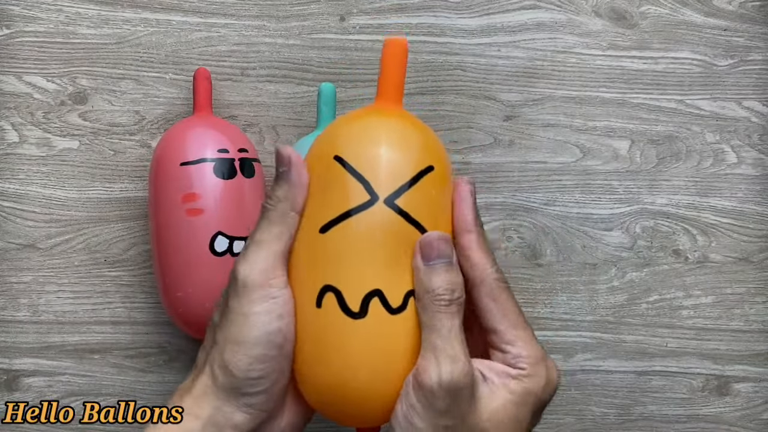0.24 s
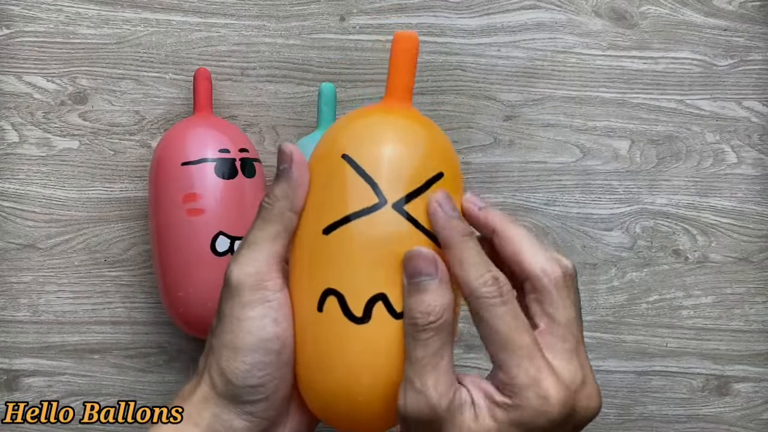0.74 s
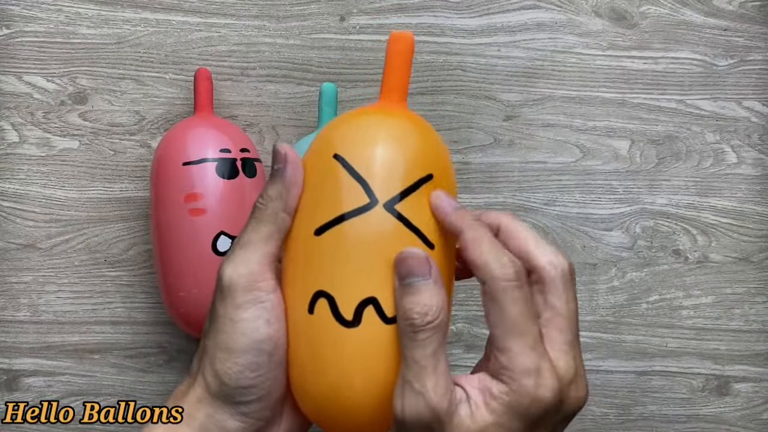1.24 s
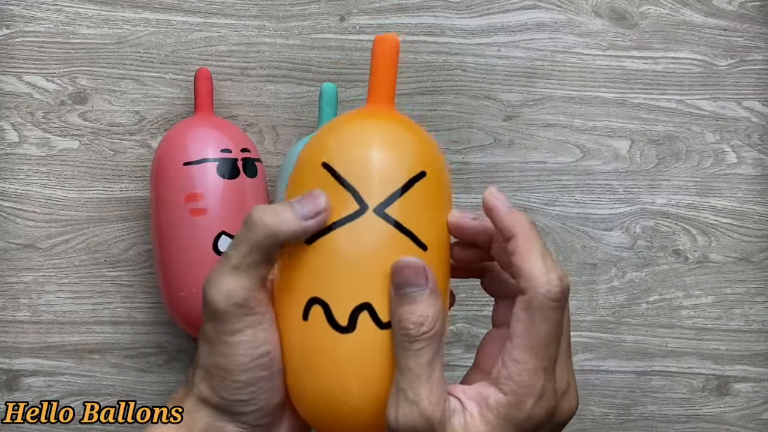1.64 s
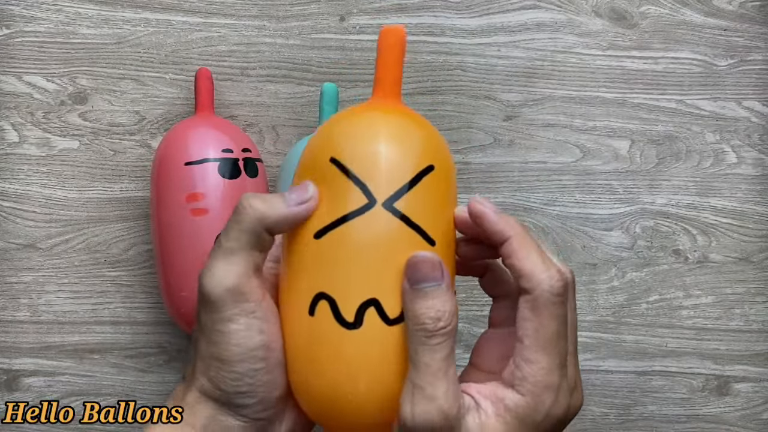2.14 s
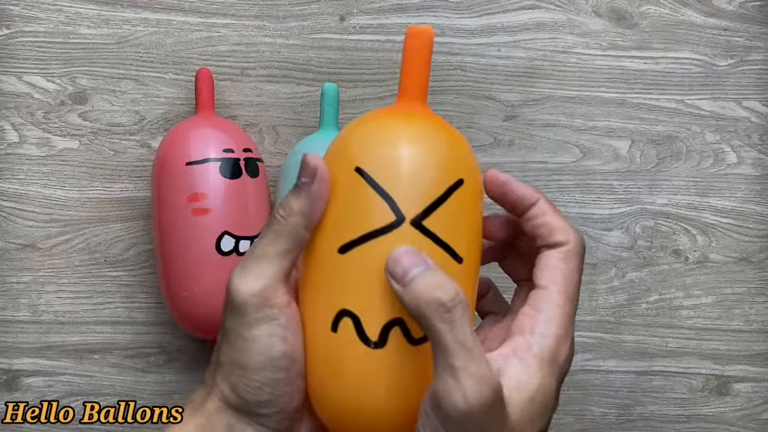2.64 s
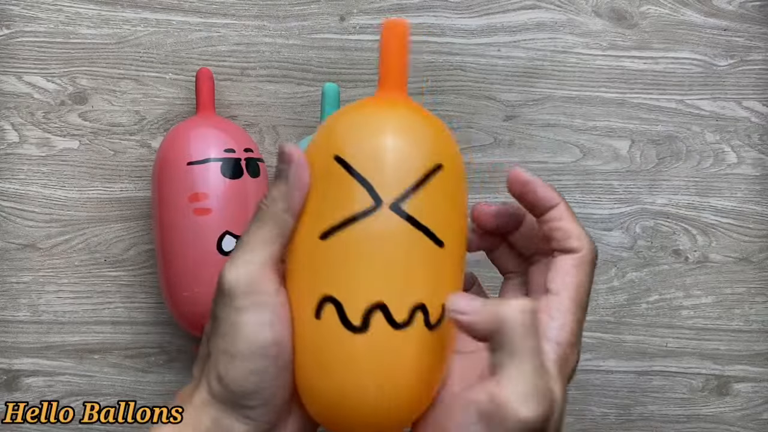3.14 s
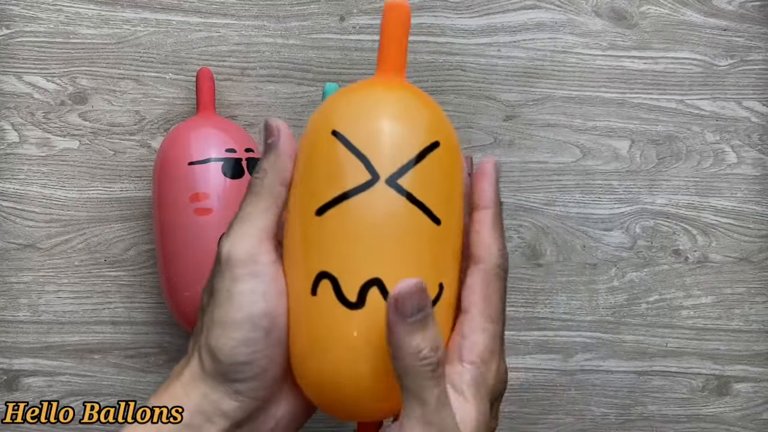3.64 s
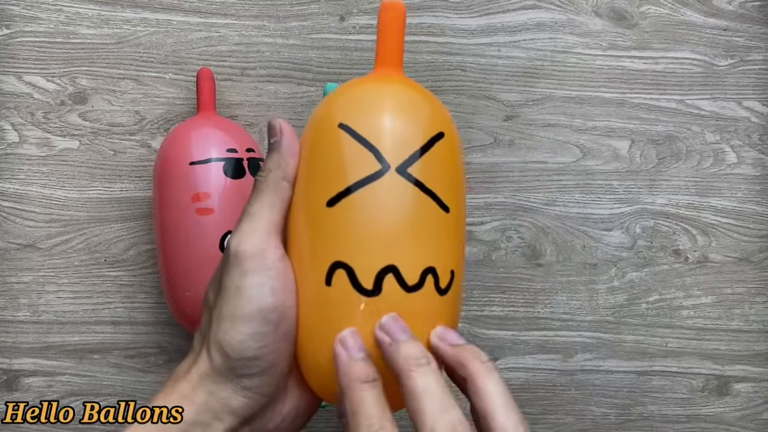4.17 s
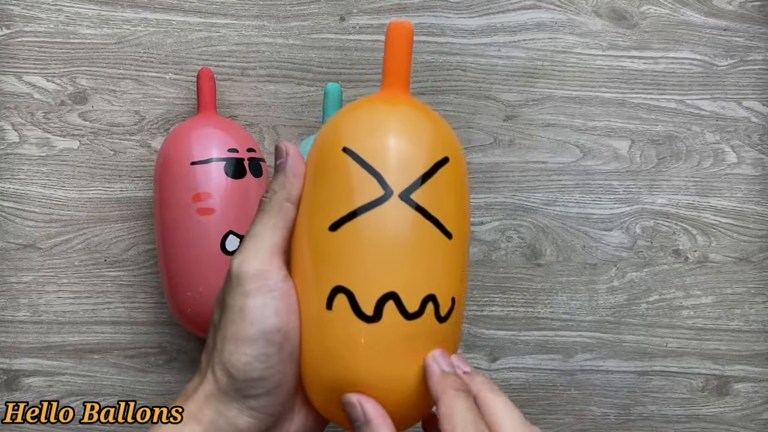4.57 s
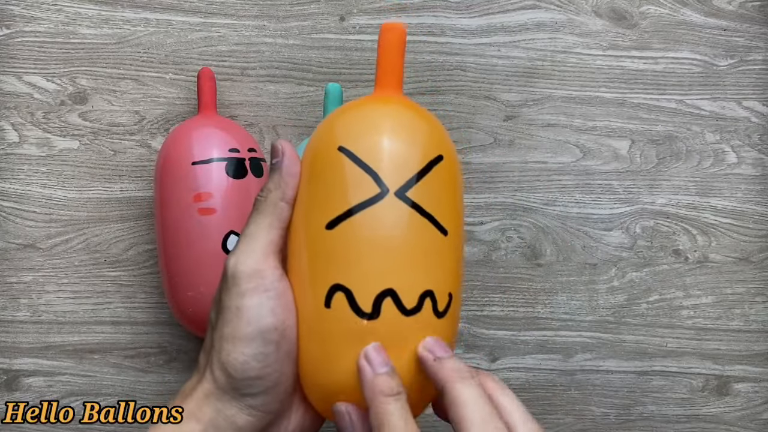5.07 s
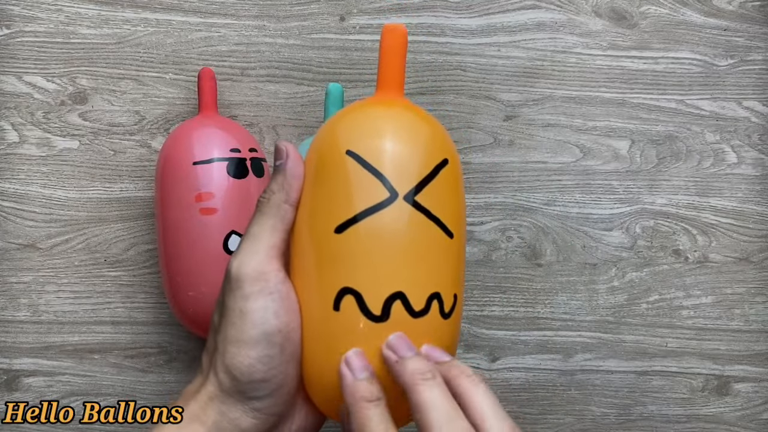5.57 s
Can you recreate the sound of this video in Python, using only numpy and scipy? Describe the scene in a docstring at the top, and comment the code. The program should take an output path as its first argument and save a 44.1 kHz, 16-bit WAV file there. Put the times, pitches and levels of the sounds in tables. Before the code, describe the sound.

Hands rub and squeeze a filled rubber balloon close up, making short, irregular creaks, snaps and squeaks in a small room.

```python
"""A small room: hands rub and squeeze a filled rubber balloon over a table, close to a stereo mic.
The fingers stick and slip. Each slip sends a falling ripple round the skin; trains of slips creak,
single hard ones snap, and the fastest lock into short squeals. The air inside rings and the soft
body wobbles. Behind it sit the faint creep of a palm, soft reflections and a low room rumble."""
import sys
import numpy as np
from scipy import signal
from scipy.fft import rfft, irfft
from scipy.io import wavfile
from scipy.ndimage import uniform_filter1d

SR = 44100
rng = np.random.default_rng(int(sys.argv[2]) if len(sys.argv) > 2 else 0)


def int16_out(signal):
    """Quantize to a 16-bit WAV file."""
    q = np.round(np.clip(np.atleast_2d(signal).T, -1, 1) * 32767)
    wavfile.write(sys.argv[1], SR, q.astype(np.int16))


N = 256220

# Finger drags, layer levels before the trims in creak(): start/s, end/s, grip/s, release/s,
# ripple/dB, heave/dB, chatter/dB, crackle/dB, skin resonance at full grip/Hz, mid-drag slip rate/Hz
DRAG_CUES = [ (0, 0.065, 0.0032, 0.0087, -31.5, -35.5, -47, -50.5, 647, 109),
             (.228, 0.316, .032, 0.0046, -27.5, -32, -46.5, -50, 700, 170),
             (0.344, 0.378, .003, 0.027, -44, -46, -49, -58.5, 684, 230.9),
             (0.382, 0.457, 0.016, 0.0067, -53, -63.5, -61, -61, 650, 330),
             (.728, 0.829, 0.022, 0.032, -26.5, -33.5, -42.5, -51, 678, 180),
             (1.02, 1.105, 0.045, 0.028, -31, -32.5, -50.5, -51, 655, 207),
             (1.261, 1.302, 0.0069, 0.025, -34.5, -36, -73, -56, 708, 210),
             (1.407, 1.446, 0.0041, 0.015, -48, -57, -65, -56.5, 665, 157),
             (1.446, 1.497, 0.025, 0.023, -30, -36.5, -50, -47, 685, 301.07),
             (1.605, 1.688, 0.055, 0.013, -28, -34, -34, -39.5, 734, 214),
             (1.835, 1.928, .02, 0.053, -41, -47.5, -65, -56, 692, 146),
             (2.125, 2.227, 0.093, 0.002056, -45, -50, -64, -58.5, 668, 197),
             (2.449, 2.612, 0.02, 0.087, -42.5, -54, -52, -57, 660, 145),
             (2.701, 2.804, 0.045, 0.022, -38, -48.5, -47, -50, 677, 200),
             (2.91, 3.007, 0.08, 0.027, -35, -45, -40.5, -47.5, 690, 201),
             (3.081, 3.123, 0.03, 0.0016, -33.5, -47, -44, -47, 750, 286),
             (3.134, 3.198, 0.0015, 0.044, -41, -43.5, -57, -57, 630, 347.1),
             (3.439, 3.485, 0.0038, .034, -40.5, -53, -52.5, -57, 665, 290),
             (3.478, 3.514, 0.0022, 0.017, -34, -40, -36.5, -49, 643, 280),
             (3.584, 3.635, 0.0018, 0.043, -48, -47.5, -46, -50, 610.8, 218),
             (3.746, 3.868, 0.014, 0.047, -31, -36, -56, -50, 620, 160),
             (4.137, 4.179, 0.013, 0.0058, -52.5, -63, -62.5, -57.5, 720, 200),
             (4.171, 4.229, 0.0052, .026, -25.5, -39.5, -33.5, -47, 683.3, 190),
             (4.273, 4.377, 0.011, 0.041, -26, -37.5, -42, -42, 723, 179),
             (4.373, 4.518, 0.015, 0.067, -22.5, -32, -35, -38.5, 647, 203),
             (4.519, 4.657, 0.014, 0.086, -22.5, -29.5, -33, -43.5, 728, 180),
             (4.69, 4.771, 0.0046, 0.021, -53.5, -56.5, -73, -60.5, 700, 220),
             (4.876, 4.902, .004, 0.003, -39.5, -59.5, -53, -59, 713.7, 305),
             (4.903, 4.984, 0.012, .002, -33.5, -52, -47, -47, 706, 350),
             (4.986, 5.124, 0.0023, 0.025, -28, -38, -46.5, -49, 704, 170),
             (5.159, 5.252, 0.011, 0.0096, -26.5, -34, -40.5, -49, 654, 191.67),
             (5.251, 5.381, .016, 0.053, -25.5, -32, -36.5, -54, 767, 180),
             (5.603, 5.683, 0.0084, 0.0021, -27.5, -41.5, -39.5, -58, 746, 229),
             (5.679, 5.811, 0.0038, 0.014, -22.5, -34.5, -44, -45.5, 700, 168), ]
# Single hard slips, levels before the trims in snap(): t/s, ripple/dB, skin pitch/Hz, heave/dB, tick/dB
SNAP_CUES = [(0.039, -21, 636, -41.5, -53), (0.071, -18, 790, -28.5, -38), (0.079, -18.5, 700, -23, -46),
             (0.198, -33, 655, -48, -61), (0.209, -33, 641.2, -47.5, -56), (0.32, -14.5, 738, -28.5, -34.5),
             (0.441, -42.5, 634, -63, -62), (0.712, -34, 685.7, -39.5, -67),
             (0.722, -28.5, 700, -35.5, -56), (0.757, -17.5, 657, -21, -60),
             (0.795, -20.5, 718.4, -36.5, -44), (0.963, -45, 624, -50, -63), (1.018, -37, 595, -49, -57),
             (1.038, -22, 630, -25.5, -52), (1.068, -19, 692, -25, -55), (1.209, -34.5, 680, -44, -54),
             (1.267, -32, 715, -31.5, -58), (1.407, -33.5, 693, -50, -59), (1.423, -36, 600, -52, -55),
             (1.46, -26, 660, -32, -71), (1.47, -22.5, 726, -36, -67), (1.652, -19.5, 734, -29.5, -51),
             (1.659, -21, 770, -25.5, -50), (1.885, -34, 714, -85, -48.5), (1.941, -28, 740, -30.5, -45),
             (2.016, -33.5, 710, -44, -51.5), (2.044, -22, 612, -31, -51), (2.049, -20.5, 670, -23, -42),
             (2.215, -16.5, 700, -21, -34), (2.394, -45, 670, -60, -71), (2.509, -32.5, 678, -54, -46.5),
             (2.584, -33.5, 632.4, -39.5, -55), (2.765, -19, 705, -32, -41), (2.87, -46.5, 710, -57, -69),
             (2.97, -20.5, 650, -34, -40), (3.121, -13, 685, -21.5, -33.5), (3.196, -33.5, 690, -42, -52),
             (3.215, -16, 703, -24, -44), (3.234, -11.5, 787, -29.5, -32.5),
             (3.319, -23.5, 676, -36, -48.5), (3.33, -26.5, 576, -47, -64.5), (3.418, -41, 617, -56, -80.5),
             (3.483, -24, 624, -34.5, -38.5), (3.512, -12, 737, -17.5, -51.5),
             (3.578, -19.5, 607, -52, -42), (3.667, -35, 573, -44, -57), (3.697, -36.5, 675, -49, -56),
             (4.097, -40.5, 750, -45, -72.5), (4.296, -14, 735, -41, -59), (4.909, -21.5, 705, -46, -49.5),
             (4.991, -18.5, 844, -57, -45), (4.999, -17, 800, -52, -39), (5.008, -15.5, 698, -45, -46),
             (5.164, -20.5, 630, -32, -62), (5.532, -43, 690, -46, -75), (5.74, -13, 697, -52, -36.5)]
# Slips locked into a tone: t/s, length/s, first f/Hz, last f/Hz, level/dB, overtones/dB, roughness/0-1
SQUEAL_CUES = [ (0.079, .012, 1390, 2018, -23.5, -3.5, 0.49), (0.08, 0.011, 2650, 3710, -32, -19, 0.39),
               (0.32, 0.01, 2210, 3370, -25, -13.5, 0.86), (0.392, 0.024, 2306, 3470, -50.5, -16, 0.32),
               (0.502, 0.034, 1720, 2460, -65, -22, 0.75), (0.797, 0.017, 748, 968, -26, -13.5, 0),
               (0.809, 0.019, 1142, 1526, -40, -6.5, 0.04), (1.069, 0.014, 684, 655, -24.5, -16.5, 0.03),
               (1.669, 0.011, 1703, 3280, -34.5, 4, 0.61), (1.944, 0.014, 1474, 3020, -40.5, -5.5, 0.91),
               (2.039, 0.028, 1248, 2300, -38, -4, 0.85), (2.211, 0.022, 1727, 3290, -42.5, 5, 0.9),
               (2.77, 0.024, 697, 744, -28.5, -29, 0.16), (3.237, 0.0075, 858, 1168, -17, -13.5, 0.16),
               (3.238, 0.011, 1983, 3950, -26.5, -11.5, 0.56), (3.51, .011, 2014, 4030, -21.5, -14, 0.84),
               (3.759, 0.01, 684, 641, -23.5, -25, 0.08), (3.77, 0.035, 648, 570.5, -14, -28.5, 0.04),
               (3.805, .034, 600, 487.4, -25.5, -19, .4), (4.407, 0.03, 699, 678, -17, -19, 0.11),
               (4.701, 0.026, 1493, 1820, -54.5, 1, 0.31), (4.91, .03, 1055, 1250, -38.5, -10.5, 0.11),
               (4.938, 0.024, 1170, 1313, -36, -5, .1), (4.958, .028, 1325, 1003, -36, -16, 0.19),
               (4.985, .03, 951, 736, -27, -13.5, .15), (5.024, .028, 734, 657, -23, -20, .25),
               (5.398, 0.027, 1797, 2144, -51.5, -10.5, 0.48), (5.653, 0.014, 659, 740, -23.5, -24, 0),
               (5.684, .052, 674, 664, -27.5, -25, 0.36), (5.736, .042, 829, 729, -23.5, -22, 0.35)]
# Standing waves in the enclosed air: f/Hz, relative level/dB, t60/s
AIR_MODES = [(407, -6, .2), (599, -6, .1), (1277, -7, .1), (1597, 2, .13), (1790, -9, .08), (2023, -5, .12),
             (2200, -7, .09), (2541, -7, .1), (2816, 1.5, .13), (3094, 4, .15), (3230, -3, .12),
             (3696, -1, .13), (3980, -7, .12), (4343, -6, .13), (5800, -7, .12)]
# Tone of the grit as rubber tears loose: f/Hz, level/dB
CRACKLE_EQ = [(300, -31), (900, -20), (1600, -5.5), (2900, 3), (4000, -7), (5500, -10), (8000, -10.5),
              (10000, -13), (15000, -19.5)]
# Dry skin on rubber, a further EQ that thins crackle to fizz: f/Hz, level/dB
FIZZ_EQ = [(1500, -41), (4000, -4), (7000, -16.5), (10000, -11), (15000, 3)]
# How well the hollow balloon radiates: f/Hz, level/dB
BODY_EQ = [(100, 2), (300, -1), (400, 0.5), (500, -2.5), (590, 4.5), (720, 1.5), (900, 0), (1180, -2.5),
           (1290, 2), (1430, -8.5), (1600, 3), (1800, 2), (1920, 0), (2050, 0), (2700, 0.5), (3300, 2),
           (3700, 2), (4100, -3), (5000, 0), (6000, 0.5), (11000, -1)]
# Left capsule over right: f/Hz, level/dB
LEFT_BALANCE = [(60, -2.4), (250, 1.6), (600, -0.5), (1100, 5.5), (2200, 2.5), (4000, 5.5), (12000, -1.5)]
# The left capsule hears the balloon first: f/Hz, phase lead/rad
LEFT_LEAD = [(0, 0), (60, .15), (250, .35), (700, .52), (1300, .9), (1650, .7), (2200, 1.5), (3100, 2.3),
             (4400, 5.5), (6400, 6.7), (8400, 9), (10000, 12.3), (12000, 15.5), (15000, 19.5)]
# Decay of the room: f/Hz, t60/s
ROOM_DECAY = [(100, 0.27), (500, 0.25), (1500, 0.34), (4000, 0.26), (8000, 0.35), (15000, 0.06)]
# Tone of the room's rumble: f/Hz, relative level/dB
RUMBLE_EQ = [(15, -37), (28, -4), (50, -5.5), (90, -12), (125, -13.5), (185, -15), (250, -12.5), (400, -21),
             (700, -25), (1300, -44), (3000, -53), (8000, -58), (15000, -70)]
# Response of the microphone: f/Hz, level/dB
MIC_EQ = [(15, -28.5), (30, -23), (48, 1.5), (1000, -3.5), (7000, -2.5), (10500, 0.5), (11500, -9),
          (12400, -5.5), (13400, 0.5), (14800, -4), (16000, -21)]

TOP_HZ = 16000


def creak(start, end, grip_s, release_s, ripple_db, heave_db, chatter_db, crackle_db, ring_hz, slip_hz):
    """A dragging finger: an uneven train of slips shakes the skin while the fingertip chatters."""
    t = np.arange(0, end - start, 1 / SR)
    count = len(t)
    force_db = finger_force(t, end - start, grip_s, release_s)
    rate = slip_hz * 2 ** (.3 * (t / t[-1] - .5))  # the finger speeds up by 0.3 octave
    rate *= np.exp(.25 * wander(count, 250))
    slips = np.diff(np.floor(np.cumsum(rate) / SR), prepend=-1) * amp(3.5 * wander(count, 393.4))

    skin = signal.fftconvolve(slips, ripple(1200, 640, .0016, .001, .0018))[:count]
    skin_hz = ring_hz * (1 - 1.14 * force_db)  # the ring sweeps far upward at both ends of the drag
    skin_hz *= np.exp(.055 * wander(count, 45))  # the grip keeps changing the tension
    skin += amp(3) * resonate(skin, skin_hz, 110)
    # a slow slip lets go of more rubber, so it heaves the whole balloon down to a deeper pitch
    thump = ripple(639, .12 * np.median(rate), .0043, .001, .0032)
    heave = signal.fftconvolve(slips * amp(2.1 * wander(count, 300)), thump)[:count]
    chatter_hz = 1350 * np.exp(.13 * wander(count, 70) + .16 * wander(count, 900))
    sliding = signal.lfilter([1], [1, -np.exp(-1 / (.005 * SR))], slips)  # loose just after each slip
    chatter = rasp(chatter_hz, overtones_db=-7.5, rough=.2) * sliding
    ticks = crackle(slips, decay_s=.0036, grit=2.4)
    fizz = equalise(crackle(slips, decay_s=.00079, grit=1.7), FIZZ_EQ)

    grit_db = crackle_db + .83 * force_db
    sound = amp(ripple_db - 1 + force_db) * steady(skin)
    sound += amp(heave_db + 3 + .96 * force_db) * steady(heave)
    sound += amp(chatter_db - 2 + 1.7 * force_db) * steady(chatter)
    sound += amp(grit_db - 2) * steady(ticks)
    sound += amp(-62 + .28 * (grit_db + 41)) * steady(fizz)  # barely follows force: light is crisper
    return start, sound * np.clip((t[-1] - t) / .0008, 0, 1)


def snap(start, ripple_db, hz, heave_db, tick_db, lap_s=.00857):
    """One hard slip: the ripple, its return round the balloon, a low heave and a tick."""
    soft = np.clip(-(ripple_db + 24.5) / 20, 0, 1)  # a light touch lets go gently and sounds rounder
    skin = ripple((1.5 - .35 * soft) * hz, (.8 + .1 * soft) * hz, .002, .0012 + .003 * soft, .0023)
    samples = np.arange(len(skin))
    skin += amp(-15) * np.interp(samples - lap_s * SR, samples, skin)
    heave = ripple(572, 115, .0055, .00071, .011)
    tick = crackle(signal.unit_impulse(len(skin)), decay_s=.0034, grit=1.6)
    tick *= 3 / abs(tick).max()
    return start, amp(ripple_db + 1) * skin + amp(heave_db) * heave + amp(tick_db) * tick


def squeal(start, length, first_hz, last_hz, db, overtones_db, rough):
    """Slips so fast that they merge into a pitch, gliding up or down."""
    count = int(length * SR)
    hz = np.geomspace(first_hz, last_hz, count) * np.exp(.5 * rough * wander(count, 2600))
    return start, amp(db) * rasp(hz, overtones_db, rough) * signal.windows.tukey(count, .3)


def finger_force(t, length, grip_s, release_s):
    """The finger grips, holds and lifts: its force in dB, 0 at the hold and negative either side."""
    grip = np.clip(1 - t / grip_s, 0, 1)
    release = np.clip(1 - (length - t) / release_s, 0, 1)
    return -19.5 * grip ** 1.36 - 22 * release ** .95


def ripple(first_hz, last_hz, glide_s, rise_s, decay_s):
    """Short waves outrun long ones on air-loaded rubber, so a slip arrives as a falling chirp."""
    t = np.arange(SR // 12) / SR
    hz = last_hz + (first_hz - last_hz) * np.exp(-t / glide_s)
    wave = np.sin(2 * np.pi * np.cumsum(hz) / SR) * (1 - np.exp(-t / rise_s)) * np.exp(-t / decay_s)
    return wave / abs(wave).max()


def rasp(hz, overtones_db, rough):
    """A stick-slip tone: each cycle lets go a little early or late, which frays its overtones."""
    phase = 2 * np.pi * np.cumsum(hz) / SR
    frayed = phase + .32 * wander(len(hz), 2500)
    overtones = sum(np.sin(k * frayed) * (k * hz < TOP_HZ) / (k - 1) ** 1.34 for k in range(2, 10))
    flutter = np.exp(rough * wander(len(hz), 900))
    return unit_rms((np.sin(phase) + amp(overtones_db) * overtones) * flutter)


def crackle(slips, decay_s, grit):
    """Each slip starts with a tick and tears loose in a brief burst of grit."""
    pole = np.exp(-1 / (decay_s * SR))
    burst = signal.lfilter([np.sqrt(1 - pole * pole)], [1, -pole], slips)
    return equalise(slips + grit * burst * rng.standard_normal(len(slips)), CRACKLE_EQ)


def inner_air(rubber):
    """Standing waves in the enclosed air ring on after each slip."""
    t = np.arange(SR // 3) / SR
    ring = sum(amp(db - 47 - 60 * t / t60) * np.cos(2 * np.pi * hz * t) for hz, db, t60 in AIR_MODES)
    return signal.fftconvolve(rubber, ring / 2)[:N]


def body_wobble(rubber, rest_db=-52, settle_s=.022, heave_below_hz=150):
    """The soft body wobbles between the palms, and more after a deep heave has shaken it."""
    wobble = band(rng.standard_normal(N), hz=72, width_hz=22)
    heave = signal.sosfilt(signal.butter(4, heave_below_hz, fs=SR, output="sos"), rubber)
    pole = np.exp(-1 / (settle_s * SR))
    shaken = signal.lfilter([1 - pole], [1, -pole], abs(heave))
    return steady(wobble, window=6000) * (amp(rest_db) + amp(-6) * shaken)


def palm_creep(level_db=-62, swell_db=5):
    """The holding palm creeps on the rubber and keeps the skin faintly astir."""
    creep = rng.standard_normal(N) * amp(swell_db * wander(N, 25))
    return amp(level_db) * unit_rms(band(creep, hz=650, width_hz=220))


def capsules(balloon):
    """The direct sound at two capsules a hand's width apart, the left one nearer."""
    hz = np.fft.rfftfreq(N, 1 / SR)
    tilt = amp(curve(LEFT_BALANCE, hz) / 2)
    lag = np.exp(-1j * curve(LEFT_LEAD, hz))
    return irfft(rfft(balloon) * np.array([tilt, lag / tilt]), N)


def reflections(balloon, far_db=-19, near_db=-8, near_t60=.11, taps_per_s=6000, fade_in_s=.00028):
    """A quick scatter off table and hands, then the room's tail, dying band by band."""
    taps = rng.choice([-1., 1.], (2, SR // 2)) * (rng.random((2, SR // 2)) < taps_per_s / SR)
    hz, t, bands = signal.stft(taps, SR, nperseg=256)
    # long waves bend round the hands and reach both capsules nearly alike
    long_waves = .85 / (1 + (hz[:, None] / 1200) ** 4)
    bands[1] += (bands[0] - bands[1]) * long_waves
    far = signal.istft(bands * amp(-60 * t / curve(ROOM_DECAY, hz)[:, None]), SR, nperseg=256)[1]
    near = signal.istft(bands * (1 - long_waves) * amp(-60 * t / near_t60), SR, nperseg=256)[1]
    tail = amp(far_db) * far / np.linalg.norm(far[0]) + amp(near_db) * near / np.linalg.norm(near[0])
    tail *= np.clip(np.arange(tail.shape[1]) / (fade_in_s * SR), 0, 1)
    return signal.fftconvolve(balloon[None], tail, axes=1)[:, :N]


def room_tone(mid_db=-53, width=.52):
    """A bed of low steady rumble, much alike on both sides."""
    mid, side = (unit_rms(equalise(rng.standard_normal(N), RUMBLE_EQ)) for _ in range(2))
    return amp(mid_db) * np.array([mid + width * side, mid - width * side])


def amp(db):
    """Gain from dB."""
    return 10 ** (np.asarray(db) / 20)


def unit_rms(x):
    """Normalises to an RMS of 1."""
    return x / np.sqrt(np.mean(x ** 2) + 1e-20)


def steady(x, window=900):
    """Rides the short-term level towards 1 and keeps the single pulses."""
    power = uniform_filter1d(uniform_filter1d(x ** 2, window), window // 2)
    return x / np.sqrt(abs(power) + np.mean(x ** 2) / 20 + 1e-20)


def wander(count, hz):
    """A random modulator of about unit size that glides to a new value hz times a second."""
    knots = rng.standard_normal(4096)
    return np.interp(np.arange(count) * hz / SR, np.arange(len(knots)), knots)


def curve(points, hz):
    """A table's value at hz, on a log frequency axis."""
    f, value = np.transpose(points)
    return np.interp(np.log(hz + 1), np.log(f + 1), value)


def equalise(x, points):
    """Minimum-phase EQ through the given points."""
    log_gain = np.log(amp(curve(points, abs(np.fft.fftfreq(2048, 1 / SR)))))
    taps = np.fft.ifft(np.exp(np.conj(signal.hilbert(log_gain)))).real
    return signal.fftconvolve(x, taps)[:len(x)]


def resonate(x, hz, width_hz):
    """A unity-gain resonance whose pitch may sweep."""
    turn = np.exp(2j * np.pi * np.cumsum(hz * np.ones(len(x))) / SR)
    pole = np.exp(-np.pi * width_hz / SR)
    return 2 * (turn * signal.lfilter([1 - pole], [1, -pole], x / turn + 1e-18)).real


def band(x, hz, width_hz):
    """Two resonances in series, the second twice as wide, for steeper skirts."""
    return resonate(resonate(x, hz, width_hz), hz, 2 * width_hz)


def add(mix, start, sound):
    """Lays a sound into the mix at start seconds."""
    part = mix[max(round(start * SR), 0):][:len(sound)]
    part += sound[:len(part)]


def scene():
    """The hands work the rubber, the balloon radiates it, and the room answers."""
    rubber = palm_creep()
    for source, cues in (creak, DRAG_CUES), (snap, SNAP_CUES), (squeal, SQUEAL_CUES):
        for cue in cues:
            add(rubber, *source(*cue))
    balloon = equalise(rubber, BODY_EQ) + inner_air(rubber) + body_wobble(rubber)
    return capsules(balloon) + reflections(balloon) + room_tone()


def record(dry):
    """The microphone's colour, then a steep high cut."""
    heard = np.array([equalise(channel, MIC_EQ) for channel in dry])
    high_cut = signal.firwin(511, TOP_HZ, window=("kaiser", 9), fs=SR)
    return signal.oaconvolve(heard, high_cut[None], "same")


dry = scene()
out = record(dry)
int16_out(out)
```